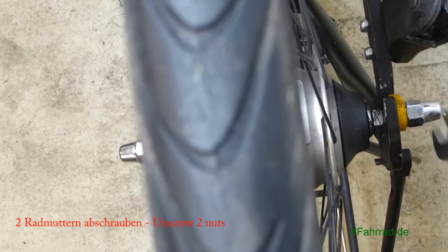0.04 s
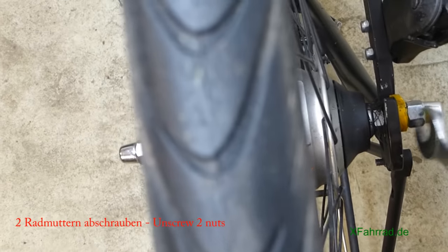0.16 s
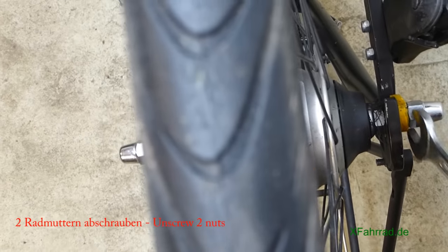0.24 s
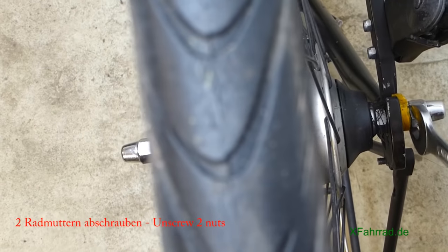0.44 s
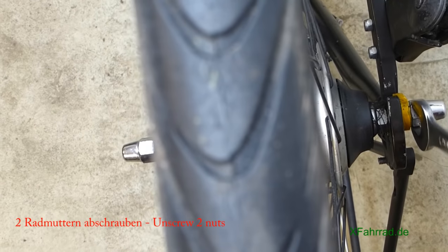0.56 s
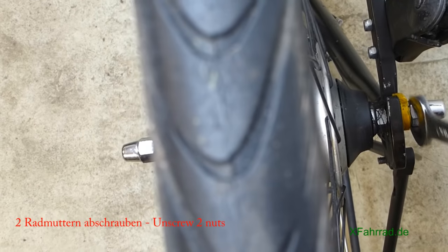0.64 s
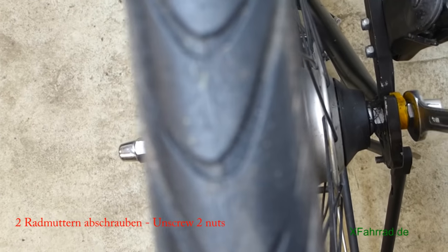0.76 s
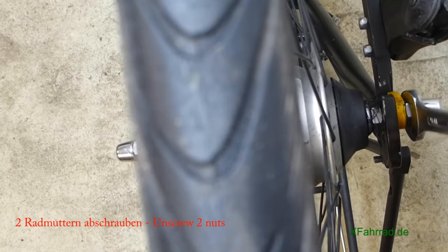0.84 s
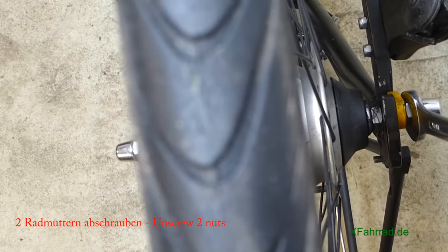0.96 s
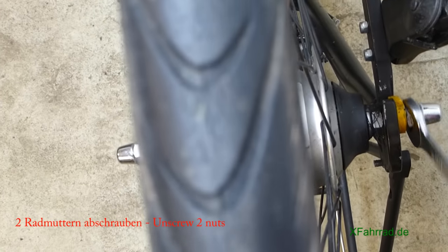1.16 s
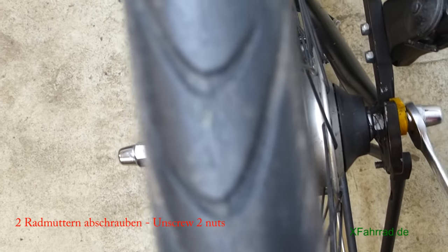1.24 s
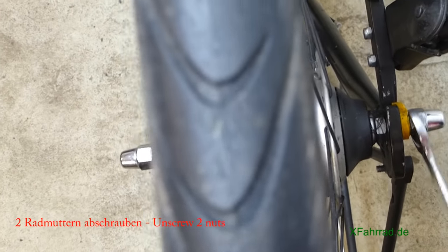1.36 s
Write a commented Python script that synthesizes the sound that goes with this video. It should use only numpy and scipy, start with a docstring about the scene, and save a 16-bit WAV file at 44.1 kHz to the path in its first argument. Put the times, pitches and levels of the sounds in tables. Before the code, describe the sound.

A steel spanner clinks four times against a bicycle axle nut, short and dry-ringing, with light touches between, then faint ticks and soft low bumps; close microphone in a hard-floored, reverberant workshop with quiet room noise.

```python
"""An open-end spanner is fitted onto a bicycle's axle nut: four steel clinks, with light touches and ticks around them.
Each clink is a snap and a clack of fading noise, plus damped sines for the ringing axle, frame and spanner.
The bicycle gives a few soft bumps, short low sines, as the spanner takes hold; the ticks are bright noise alone.
The hard floor throws these sounds back and the workshop reverberates, over quiet, steady room noise."""
import sys
import numpy as np
from scipy import signal
from scipy.fft import rfft, irfft, next_fast_len
from scipy.io import wavfile
from scipy.ndimage import uniform_filter1d, minimum_filter1d

SR = 44100
rng = np.random.default_rng(int(sys.argv[2]) if len(sys.argv) > 2 else 0)


def pcm_store(signal):
    """Save signal as 16-bit PCM."""
    levels = np.round(np.clip(np.atleast_2d(signal), -1, 1) * 32767)
    wavfile.write(sys.argv[1], SR, levels.astype(np.int16).T)


N = 61739  # length of the scene in samples


def amp(db):
    """Turn decibels into a plain multiplier."""
    return 10 ** (np.asarray(db) / 20)


def along(points, hz):
    """Read a curve of (frequency [Hz], value) points, spaced as the ear hears pitch (log axis)."""
    f, v = np.transpose(points)
    return np.interp(np.log(hz + 1), np.log(f + 1), v)


def fade(t, t60):
    """Die away exponentially, falling by 60 dB in t60 seconds."""
    return np.exp(-np.log(1000) * t / t60)


def soft_start(t, rise_s):
    """Grow from 0 towards 1; a longer rise makes a gentler start."""
    return 1 - np.exp(-t / rise_s)


def normed(x):
    """Scale x to energy 1."""
    return x / np.linalg.norm(x)


def below(hz, edge_hz, steep):
    """A smooth step from 1 under the edge to 0 over it."""
    return 1 / (1 + (hz / edge_hz) ** steep)


def coloured(x, gain):
    """Filter x by gain(Hz) with minimum phase, so that nothing sounds before its cause."""
    m = 2 * next_fast_len(len(x))
    log_gain = np.log(np.maximum(gain(np.fft.rfftfreq(m, 1 / SR)), 1e-6))
    # folding the cepstrum (the transform of the log gain) forward in time makes the filter causal
    cepstrum = irfft(log_gain, m)
    cepstrum[1:m // 2] *= 2
    cepstrum[m // 2 + 1:] = 0
    response = np.exp(rfft(cepstrum))
    return irfft(rfft(x, m) * response, m)[:len(x)]


EVEN_HZ = 70  # width of the smoothing


def even(x):
    """Level out broad chance peaks and dips in the spectrum of x."""
    power = np.abs(uniform_filter1d(np.abs(rfft(x)) ** 2, int(EVEN_HZ * len(x) / SR)))
    relative_power = power / power.mean()
    hz = np.fft.rfftfreq(len(x), 1 / SR)
    return coloured(x, lambda f: np.interp(f, hz, relative_power) ** -.5)


def add(track, s, x):
    """Mix x into track at time s in seconds."""
    part = track[max(round(s * SR), 0):][:len(x)]
    part += x[:len(part)]


def burst(spectrum, t60, t):
    """Coloured, dying noise of energy 1, for a hit with no clear pitch."""
    noise = even(rng.standard_normal(len(t)) * fade(t, t60))
    return normed(coloured(noise, lambda f: amp(along(spectrum, f))))


def ring(modes, t):
    """Sum damped sines, each with the energy of its level, varied at random by about 1 dB."""
    out = np.zeros(len(t))
    for hz, db, t60 in modes:
        level = amp(db + rng.normal(0, 1))
        tone = np.sin(2 * np.pi * (hz * t + rng.random()))
        out += level * normed(tone * fade(t, t60))
    return out


# quiet room noise: (frequency [Hz], relative level [dB per Hz])
AIR_SPECTRUM = [(25, -18), (55, -9.5), (100, -2), (270, -2.5), (380, -3), (600, -8.5), (900, -11.5),
                (1200, -8.5), (1700, -14), (4000, -19), (5500, -21.5), (7500, -21), (9500, -21.5),
                (12500, -29), (15800, -31.5)]
AIR_DB = -51  # overall level


def air():
    """Steady room noise: random noise with its own balance of low and high."""
    noise = rng.standard_normal(N + SR // 2)
    x = coloured(noise, lambda f: amp(along(AIR_SPECTRUM, f)))[-N:]  # skip the filter's start
    return amp(AIR_DB) * x / x.std()


# how long the workshop rings on: (frequency [Hz], time to fall by 60 dB [s])
ROOM_DECAY = [(200, 0.55), (1000, 0.48), (3000, 0.43), (6000, 0.37), (12000, 0.24)]
# which pitches the workshop favours: (frequency [Hz], relative level [dB])
ROOM_TONE = [(200, 0.5), (900, 6), (3000, 1.65), (6000, -1.5), (12000, -2)]
ROOM_DB, ROOM_DELAY_S, ROOM_BUILD_S = -0.81, .004, 0.0012
FLOOR_DELAY_S, FLOOR_DB, FLOOR_DULL_HZ = 0.0059, -4.5, 6500  # echo off the floor


def workshop(x, room_db):
    """Direct sound, its duller echo off the floor and a diffuse tail of fading noise."""
    # each pitch of the tail dies at its own speed
    hz, s, z = signal.stft(rng.standard_normal(len(x)), SR, nperseg=256)
    decay = fade(s, along(ROOM_DECAY, hz)[:, None])
    tail = signal.istft(z * decay, SR, nperseg=256)[1][:len(x)]
    tail = normed(even(tail * soft_start(np.arange(len(x)) / SR, ROOM_BUILD_S)))
    tail = coloured(tail, lambda f: amp(along(ROOM_TONE, f)))
    echo = coloured(x, lambda f: below(f, FLOOR_DULL_HZ, 7.8) ** .5)
    out = x.copy()
    add(out, FLOOR_DELAY_S, amp(FLOOR_DB) * echo)
    add(out, ROOM_DELAY_S, amp(room_db) * signal.fftconvolve(x, tail))
    return out


# the dense, quickly damped clack under the ring: (frequency [Hz], relative level [dB per Hz])
CLACK_SPECTRUM = [(120, -28.5), (300, -13), (550, -10), (950, -6.5), (1250, -6.5), (1800, -3.5),
                  (2450, 0.5), (3100, -1), (3700, -2.5), (4800, -8.5), (6300, -5), (8800, -16.5),
                  (12000, -16.5), (15500, -38)]
CLACK_DB, CLACK_T60_S = 2, 0.032


def clack(t):
    """Many tones too dense and brief to tell apart, made as fading noise."""
    return amp(CLACK_DB) * burst(CLACK_SPECTRUM, CLACK_T60_S, t)


# the bright snap of the first touch: (frequency [Hz], relative level [dB per Hz])
SNAP_SPECTRUM = [(500, -14), (1400, -2.5), (2600, 7.5), (4500, 5), (7000, 6.5), (9500, 1.5), (13000, 2.5),
                 (15500, -6)]


def snap(t60, t):
    """The bright noise of steel touching steel, with energy 1."""
    return burst(SNAP_SPECTRUM, t60, t)


RING_DB = -4  # shared by both rings
# ring of axle, nut and frame: (frequency [Hz], relative level [dB], time to fall by 60 dB [s])
AXLE_MODES = [(351, -25.5, 0.047), (566, -19.5, 0.034), (734.6, -21, 0.074), (1416, -11, 0.031),
              (2020, -15, 0.13), (2112, -9.5, 0.053), (2501.5, -9.5, .065), (2550, -9, 0.038),
              (2683, 0, 0.017), (2973, -6, 0.043), (3404, -6.5, 0.043), (3695, -1, 0.023),
              (4357, -6.5, 0.019), (5940, -9, 0.054)]


def axle_ring(t):
    """Axle, nut and frame vibrate at their own pitches and soon die away."""
    return amp(RING_DB) * ring(AXLE_MODES, t)


# ring of the spanner: (frequency [Hz], relative level [dB], time to fall by 60 dB [s])
SPANNER_MODES = [(5603, -7.5, .02), (8460, -23, 0.017), (9200, -30, 0.061), (11080, -25, 0.011)]


def spanner_ring(spanner_db, t):
    """The spanner vibrates at a few high pitches, more or less strongly at each contact."""
    return amp(RING_DB + spanner_db) * ring(SPANNER_MODES, t)


THUD_EDGE_HZ, MIDDLE_EDGE_HZ = 920, 2494
THUD_STEEP, MIDDLE_STEEP, TREBLE_STEEP = 3, 30, 17


def contact_tone(hz, thud_db, middle_db, treble_db, edge_hz):
    """A blunt contact has more thud and middle, and less treble, than a sharp one."""
    thud = below(hz, THUD_EDGE_HZ, THUD_STEEP)
    middle = (1 - thud) * below(hz, MIDDLE_EDGE_HZ, MIDDLE_STEEP)
    treble = 1 - below(hz, edge_hz, TREBLE_STEEP)
    return amp(thud_db * thud + middle_db * middle + treble_db * treble)


BLOW = np.sqrt(SR * .005)  # sets levels as if all the energy fell in the first 5 ms
SNAP_DB, SNAP_T60_S = -9.5, 0.0093
SPANNER_ROOM_DB = -5  # the spanner is near, and sends less into the room than the frame
# contacts of spanner and nut: (time [s], level before tone and rise [dB], thud [dB], middle [dB],
# treble [dB], treble edge [Hz], spanner ring [dB], rise [s])
CONTACT_LIST = [(0.2403, -26, 4.5, 3.5, -15.5, 5300, -24, 0.0016), (.319, -40, -17, 2, -10, 6000, 0, .001),
                (0.3702, -18.5, -3, -7.5, -2, 4640, -7, 0.00079), (.565, -42.5, 19, 5, -2, 5000, 0, 0.0031),
                (.5798, -20, -3.5, -.5, 0.5, 5100, 2, 0.00054), (0.769, -45.5, -7, 2, 7, 4500, -5, 0.0016),
                (0.786, -35, -11, 6, 2, 5060, 0, 0.0029), (0.7916, -38, 15, -3, -20, 4400, -1, 0.0012),
                (0.7971, -22.5, 8.5, 8, -13.5, 5320, 14, 0.0026),
                (.968, -41.5, -13, -10, -15.5, 5800, -10, 0.00065)]


def clinks():
    """Steel on steel: each contact gives a snap, a clack and briefly ringing metal."""
    out, t = np.zeros(N), np.arange(SR * 3 // 5) / SR
    for s, db, thud_db, middle_db, treble_db, edge_hz, spanner_db, rise_s in CONTACT_LIST:
        bicycle = clack(t) + amp(SNAP_DB) * snap(SNAP_T60_S, t) + axle_ring(t)
        spanner = spanner_ring(spanner_db, t)
        for part, room_db in (bicycle, ROOM_DB), (spanner, SPANNER_ROOM_DB):
            struck = coloured(part * soft_start(t, rise_s),
                              lambda f: contact_tone(f, thud_db, middle_db, treble_db, edge_hz))
            add(out, s, BLOW * amp(db) * workshop(struck, room_db))
    return out


BUMP_HZ, BUMP_RISE_S = 380, 0.0022
# soft bumps of the bicycle: (time of the peak [s], level [dB])
BUMP_LIST = [(1.127, -44), (1.231, -48), (1.297, -49.5), (1.385, -50.5)]


def bumps():
    """Short, low knocks as the bicycle shifts: a sine that swells and dies quickly."""
    out, t = np.zeros(N), np.arange(SR // 2) / SR
    u = t / BUMP_RISE_S
    swell = u * np.exp(1 - u)  # reaches 1 after the rise time
    knock = swell * np.sin(2 * np.pi * BUMP_HZ * t)
    for s, db in BUMP_LIST:
        add(out, s - BUMP_RISE_S, amp(db) * workshop(knock, ROOM_DB))
    return out


TICK_T60_S = 0.04
# light ticks of the jaw settling on the nut, too weak to ring it: (time [s], level [dB])
TICK_LIST = [(1.1723, -40.5), (1.366, -48.5)]


def ticks():
    """Only the bright snap of a contact, dying more slowly than in a clink."""
    out, t = np.zeros(N), np.arange(SR // 2) / SR
    for s, db in TICK_LIST:
        add(out, s, BLOW * amp(db) * workshop(snap(TICK_T60_S, t), ROOM_DB))
    return out


def scene():
    """Clinks, ticks and bumps over the room noise, in one channel."""
    return (clinks() + ticks() + bumps() + air())[None]


LIMIT_DB, LIMIT_HOLD_S = -10.3, .003
TOP_HZ = 15850  # band limit


def record(dry):
    """A limiter holds the sharpest peaks; nothing is kept above the band limit."""
    size = int(LIMIT_HOLD_S * SR) + 1
    needed = 1 / np.maximum(np.abs(dry) / amp(LIMIT_DB), 1)
    gain = uniform_filter1d(minimum_filter1d(needed, size), size)  # hold, then smooth
    m = next_fast_len(N + SR // 2)
    kept = np.fft.rfftfreq(m, 1 / SR) < TOP_HZ
    return irfft(rfft(dry * gain, m) * kept, m)[:, :N]


dry = scene()
out = record(dry)
pcm_store(out)
```